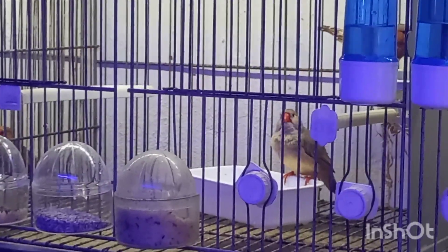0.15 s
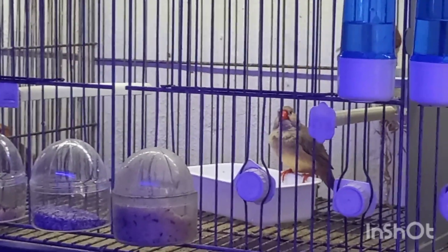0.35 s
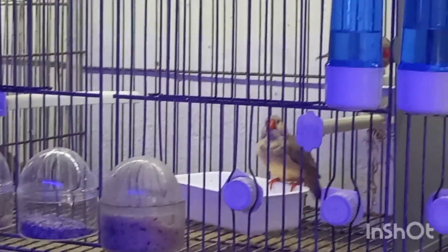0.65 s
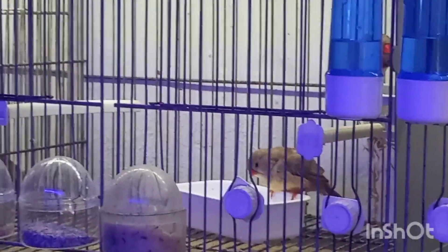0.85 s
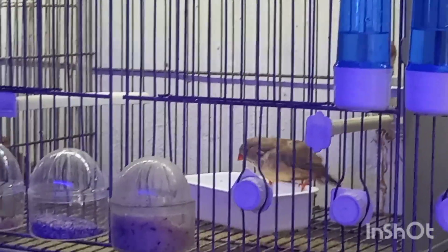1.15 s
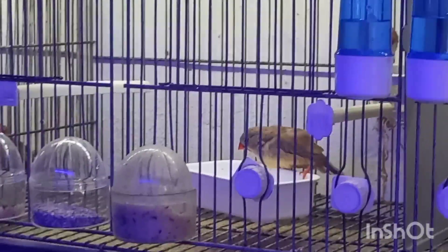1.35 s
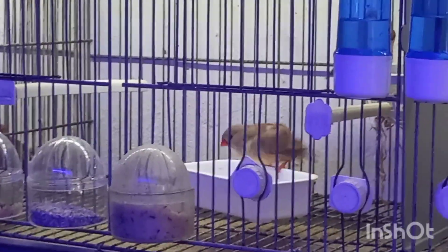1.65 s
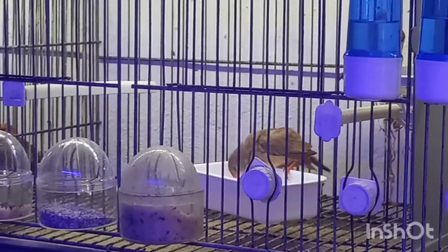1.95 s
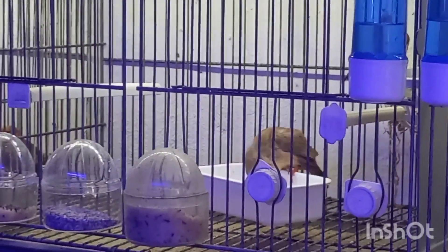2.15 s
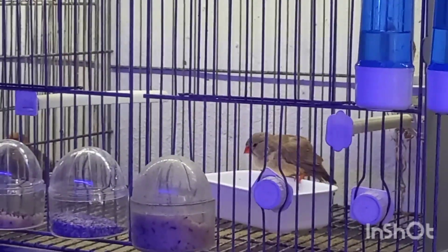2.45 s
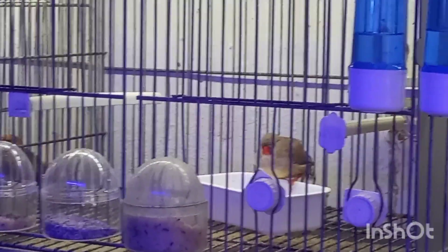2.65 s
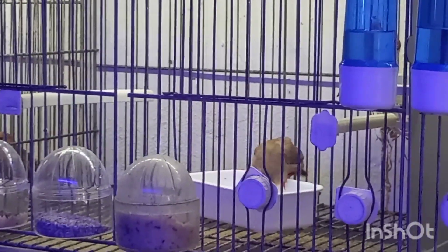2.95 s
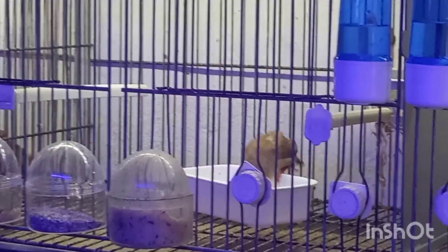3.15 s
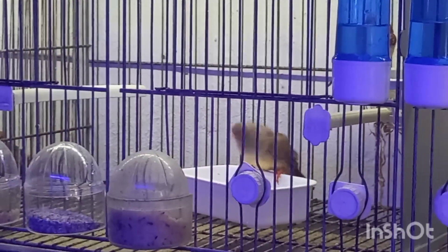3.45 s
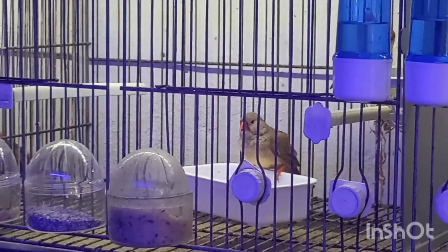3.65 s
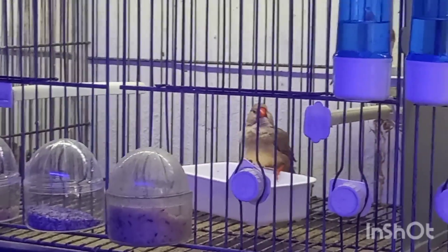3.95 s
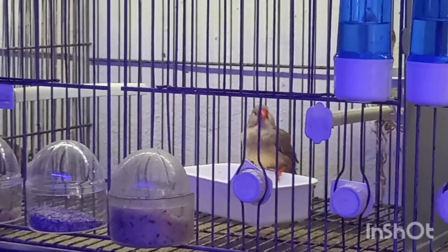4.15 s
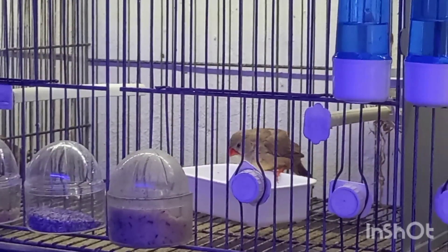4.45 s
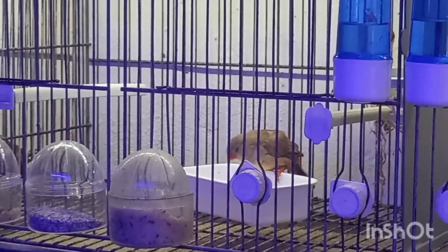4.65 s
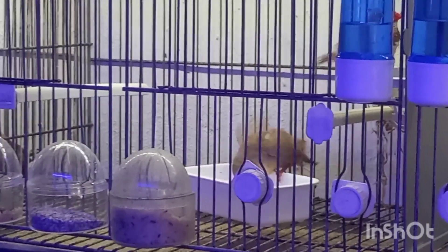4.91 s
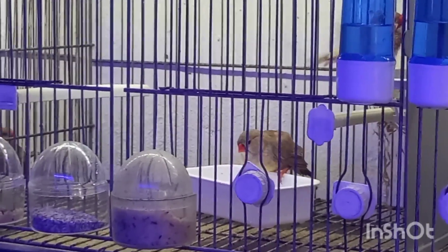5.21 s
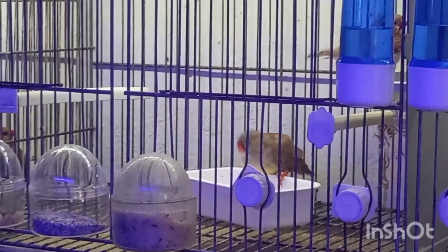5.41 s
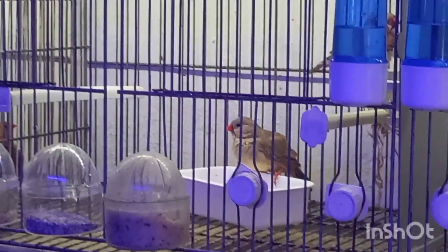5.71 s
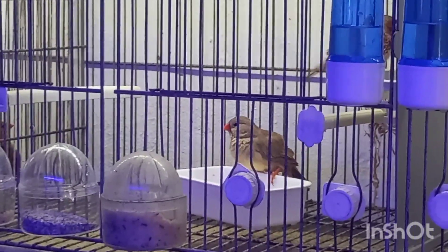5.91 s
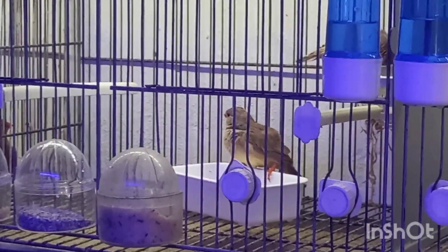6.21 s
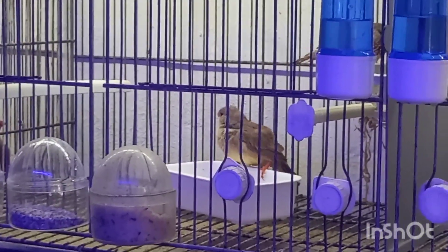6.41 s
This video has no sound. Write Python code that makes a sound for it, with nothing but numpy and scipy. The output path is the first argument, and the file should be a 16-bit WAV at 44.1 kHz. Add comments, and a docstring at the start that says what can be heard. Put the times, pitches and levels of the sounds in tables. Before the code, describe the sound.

A steady low electrical hum and soft rumble fill a small, hard-walled room throughout. Caged finches give a few soft, slightly hoarse notes in the first second. At about 1.2 seconds a quick raspy run-up leads into two louder nasal calls, between 1.6 and 2 seconds. A harsh falling chirp comes at 2.6 seconds, then a short note. A second raspy run-up starts at 3.4 seconds and opens into three evenly spaced nasal calls from 3.8 to 4.5 seconds. Sharp downward chirps follow at 4.6 and 5.2 seconds, with a barely audible thin whistle between them. From about 5 seconds, faint feather rustles and a few quiet notes continue until the end, near 6.6 seconds. The birds sound a little distant, with short reflections from the close walls.

```python
"""A small, hard-walled room with a steady mains hum, where zebra finches call in a wire cage.
Soft short notes and harsh falling chirps surround two song phrases, each a raspy run-up and then long
nasal calls: pulses and puffs of air from the syrinx, shaped by throat and beak. Feathers rustle now and
then, and a faint whistle passes late on. The birds arrive mostly by way of the walls.
A mild noise suppressor turns the hum down in the pauses."""
import sys
import numpy as np
from scipy import signal
from scipy.fft import rfft, irfft, next_fast_len
from scipy.io import wavfile
from scipy.ndimage import uniform_filter1d

SR = 44100
rng = np.random.default_rng(int(sys.argv[2]) if len(sys.argv) > 2 else 0)


def bounce(signal):
    """Save signal as a 16-bit WAV file at the path given by the first command-line argument."""
    frames = np.transpose(np.atleast_2d(signal))
    limited = np.clip(frames, -1, 1)
    pcm = np.round(limited * 32767).astype(np.int16)
    wavfile.write(sys.argv[1], SR, pcm)


N = 289734
BAND_LIMIT_HZ = 15800


def amp(db):
    """Decibels to linear gain."""
    return 10 ** (np.asarray(db) / 20)


def unit(x):
    """Scales to rms 1."""
    return x / np.sqrt(np.mean(x ** 2) + 1e-20)


def curve(points, hz):
    """Joins (freq_hz, value) points on a log-frequency axis."""
    freqs, values = np.transpose(points)
    return np.interp(np.log(hz + 1), np.log(freqs + 1), values)


def colour(x, gain_db):
    """Filters x by a function from Hz to dB."""
    size = next_fast_len(len(x) + 1024)
    return irfft(rfft(x, size) * amp(gain_db(np.fft.rfftfreq(size, 1 / SR))), size)[:len(x)]


def eq(x, points):
    """Filters x through (freq_hz, gain_db) points."""
    return colour(x, lambda f: curve(points, f))


def wander(size, rate_hz):
    """Smooth random drift below rate_hz, rms about 1."""
    noise = rng.standard_normal(size + SR // 4)
    return unit(colour(noise, lambda f: -10 * np.log10(1 + (f / rate_hz) ** 6)))[:size]


def fade(t, rise_s, fall_s):
    """Quarter-sine fade in and out."""
    fade_in = np.sin(np.pi / 2 * np.clip((t - t[0]) / rise_s, 0, 1))
    fade_out = np.sin(np.pi / 2 * np.clip((t[-1] - t) / fall_s, 0, 1))
    return fade_in * fade_out


def pan(sound, pan_db):
    """Stereo with the left side pan_db above the right."""
    return amp([[pan_db / 2], [-pan_db / 2]]) * sound


def place(mix, start_s, sound, pan_db):
    """Pans a sound and adds it to the mix at start_s."""
    part = mix[:, round(start_s * SR):][:, :len(sound)]
    part += pan(sound[:part.shape[1]], pan_db)


def noise_bed(spectrum, level_db):
    """Steady stereo noise, nearly centred in the bass and wide in the treble."""
    # likeness of left and right: freq_hz, coherence (0-1)
    likeness = [(25, 0.83), (70, 0.78), (150, 0.82), (300, 0.75), (600, 0.34), (1500, 0.21), (15000, .1)]
    left, independent = rng.standard_normal((2, N))
    coherence = curve(likeness, np.fft.rfftfreq(N, 1 / SR))
    right = irfft(coherence * rfft(left) + np.sqrt(1 - coherence ** 2) * rfft(independent), N)
    return amp(level_db) * np.array([unit(eq(side, spectrum)) for side in (left, right)])


def mains_hum(mains_hz=50, gain_db=1.5, waver=.25, waver_hz=4):
    """Low tones of a mains-driven machine, each wavering a little."""
    # hum tones: multiple of mains_hz, level_db (before gain_db)
    partials = [(1.522, -57.5), (2, -51.5), (3, -49.5), (4, -60), (5, -63.5), (6, -62.5), (7, -62)]
    t = np.arange(N) / SR
    hum = np.zeros(N)
    for multiple, level_db in partials:
        phase = 2 * np.pi * (multiple * mains_hz * t + rng.random())
        drift = 1 + waver * (wander(N, waver_hz) + 1j * wander(N, waver_hz))
        hum += amp(level_db + gain_db) * np.sqrt(2) * (drift * np.exp(1j * phase)).real
    return pan(hum, -.8)


def room_tone():
    """A low rumble under a faint hiss."""
    # spectra of the two beds: freq_hz, gain_db
    rumble_eq = [(20, -41), (35, -27.5), (50, -4.5), (78, -0.5), (105, -7.5), (125, -10.5), (160, -3),
                 (220, -8), (290, -5), (360, -14), (420, -17), (620, -31.5), (1000, -57)]
    hiss_eq = [(350, -23), (600, -14), (727, -3), (1010, 0), (1290, -11), (1540, -9.5), (1740, -11.5),
               (2110, -2.5), (2290, -9.5), (3650, -16.5), (4550, -28.5), (8420, -22), (9650, -64),
               (12000, -30.5), (15800, -35)]
    return noise_bed(rumble_eq, level_db=-49.5) + pan(noise_bed(hiss_eq, level_db=-73), -3.5)


def syrinx(hz, rough, jitter, jitter_hz=420):
    """The bird's voice source: slightly uneven pulses, with a puff of turbulent air in every cycle."""
    phase = 2 * np.pi * np.cumsum(hz * (1 + jitter * wander(len(hz), jitter_hz))) / SR
    pulses = sum(np.cos(k * phase) for k in range(1, int(BAND_LIMIT_HZ / hz.min()) + 2))
    puffs = (1 + np.cos(phase)) * rng.standard_normal(len(hz))
    return (1 - rough) * unit(pulses) + rough * unit(puffs)


def short_note(length_s, first_hz, last_hz, level_db, beak_hz, beak_db, treble_db, rough, arch_oct=0):
    """A glide through windpipe and beak: a resonance, a dip an octave up, a peak at three times it."""
    # the throat before the beak resonance: freq_hz, gain_db
    throat_eq = [(450, -13.5), (750, -1.5), (1050, 8.5), (1400, -4), (1900, 8), (3800, 0), (5200, -1),
                 (6500, -11), (8600, -8.5), (10500, -23.5), (13000, -30), (15300, -24)]
    t = np.arange(0, length_s, 1 / SR)
    arch = 2 ** (arch_oct * (np.sin(np.pi * t / length_s) - 2 / np.pi))
    source = syrinx(np.geomspace(first_hz, last_hz, len(t)) * arch, rough, jitter=.06 * rough)
    beak_width_oct = .47 + .9 * rough  # harsh notes spread wider

    def bell(f, multiple, width_oct):
        return np.exp(-(np.log2((f + 1) / (multiple * beak_hz)) / width_oct) ** 2)

    def tract_db(f):
        pipe_db = beak_db * bell(f, 1, beak_width_oct) - 7 * bell(f, 2, .25) + 5 * bell(f, 3, .12)
        shelf_db = curve([(5200, 0), (6400, treble_db)], f)
        return curve(throat_eq, f) + pipe_db + shelf_db

    envelope = fade(t, rise_s=min(.41 * length_s, .024), fall_s=.0017)
    return amp(level_db) * unit(colour(source, tract_db)) * envelope


def soft_calls(mix):
    """Low, slightly hoarse contact notes, each a glide with an arch laid over it."""
    # start_s, length_s, first_hz, last_hz, level_db, beak_hz, beak_db, treble_db, roughness (0-1)
    calls = [ (0.018, .047, 540.7, 437, -36, 3320, 18, 5, .2),
             (0.691, 0.042, 498, 423, -54, 2810, 12, 3.5, 0.17),
             (0.883, 0.051, 383, 426, -49.5, 2540, 23, 3.5, 0.22),
             (.982, 0.029, 453, 396, -50.5, 2320, 10.5, -3, 0.17),
             (2.885, .043, 629.4, 485.5, -40, 2650, 17, 3.5, 0.5),
             (3.124, 0.069, 647, 624, -58.5, 2530, 14, -27, 0.25),
             (3.762, 0.094, 485, 502.4, -42.5, 3260, 12, 3, 0.31),
             (4.745, .036, 455.5, 430, -45.5, 2170, 12.5, -1.5, 0.39),
             (5.701, .048, 586.5, 578.7, -47, 2340, 9, 8, 0.31),
             (6.032, 0.048, 473, 439.6, -54.5, 2420, 8, -2, 0.26),
             (6.282, 0.066, 482.4, 474.7, -49.5, 2660, 10, -4, 0.2),
             (6.55, 0.038, 563, 573, -55, 2270, 21, -4, 0.1)]
    for start_s, *shape in calls:
        place(mix, start_s, short_note(*shape, arch_oct=.064), pan_db=-5)


def rustles(mix, ticks_per_s=1500):
    """Feathers and feet on the wires: clumps of tiny ticks."""
    # movements: start_s, length_s, level_db, tilt_db_per_octave
    moves = [(0.234, 0.016, -67, 1.5), (4.876, 0.013, -63.5, 3), (4.918, 0.023, -62, 3),
             (4.954, 0.037, -72, 3), (5.058, 0.032, -67, 3), (5.295, 0.16, -59, 2),
             (5.501, 0.13, -67.5, -1.5), (5.708, 0.045, -55, 4), (6.164, 0.0068, -65, -6),
             (6.244, 0.14, -59, 0.5), (6.42, 0.042, -66.5, 2)]
    tick_eq = [(200, 6), (700, 6), (2500, -2), (5500, -11.5), (8500, -6.5), (12000, -14.5), (15000, -9.5)]
    for start_s, length_s, level_db, tilt_db in moves:
        t = np.arange(0, length_s, 1 / SR)
        ticks = rng.standard_normal(len(t)) * (rng.random(len(t)) < ticks_per_s / SR)
        ticks = colour(ticks, lambda f: curve(tick_eq, f) + tilt_db * np.log2(f + 1))
        envelope = fade(t, rise_s=length_s / 3, fall_s=length_s / 2)
        place(mix, start_s, amp(level_db) * unit(ticks) * envelope, pan_db=-5)


def run_ups(mix, soft_db=-47, loud_db=-37.5):
    """Raspy notes before the long calls: with more effort they fall further, open the beak and clear."""
    # run-up notes: start_s, length_s, pitch_hz, level_db
    notes = [ (1.182, 0.079, 1218, -46.5), (1.255, 0.035, 1115, -46), (1.34, 0.034, 1043, -44),
             (1.388, 0.03, 1059, -37.5), (1.436, 0.032, 1019, -46.5), (1.473, 0.028, 1067, -39),
             (3.407, 0.0513, 1185, -48.5), (3.473, .054, 1145, -44.5), (3.561, 0.0367, 1180, -42),
             (3.612, 0.024, 1052, -36), (3.645, 0.05, 1054, -45), (3.699, 0.028, 1069, -39)]
    # softest and loudest voicing: fall_octaves, beak_hz, beak_db, treble_db, roughness (0-1)
    voicings = [(0.102, 2270, 2.5, -0.5, 0.69), (.22, 3910, 9, 0, 0.48)]
    soft, loud = np.array(voicings)
    for start_s, length_s, hz, level_db in notes:
        effort = np.clip((level_db - soft_db) / (loud_db - soft_db), 0, 1)
        fall_oct, *timbre = soft + effort * (loud - soft)
        place(mix, start_s, short_note(length_s, hz, hz / 2 ** fall_oct, level_db, *timbre), pan_db=-1)


def nasal_voice(t, progress, hz):
    """A long call's upper voice: a clean harmonic stack through a wide-open beak, over a growing rasp."""
    # the open throat, and its turbulent air: freq_hz, gain_db
    throat_eq = [(600, -19.5), (970, -8), (1400, -34), (1950, -13), (2900, -11), (3900, 0), (4900, -15.5),
                 (5600, -23.5), (6800, -28), (8900, -22.5), (11000, -32), (13300, -39.5), (15300, -25.5)]
    rasp_eq = [(700, -16.5), (1700, -13), (2600, 0), (3700, 4.5), (4700, -4.5), (6200, -19.5), (9000, -21),
               (15000, -34)]
    stack = syrinx(hz, rough=.07, jitter=.004, jitter_hz=300)
    flutter_db = 2.2 * progress * wander(len(t), 110)  # the air stream flutters more and more
    stack = unit(eq(stack * amp(flutter_db), throat_eq))
    lows = eq(stack, [(2900, 0), (3400, -40)])
    beak_ring = eq(stack, [(3100, -40), (3400, 0), (4300, 0), (4600, -40)])
    stack += lows * (amp(-18 * np.exp(-t / .016)) - 1)  # low partials swell in after the beak speaks
    stack += beak_ring * (amp(-3 * progress ** 2) - 1)  # the ringing fourth partial weakens late
    rasp = unit(eq(syrinx(hz, rough=1, jitter=0), rasp_eq))
    return stack + rasp * amp(-15 + 6 * progress)


def long_call(length_s, held_hz, level_db, treble_db, second_hz, join_share, second_db):
    """A nasal voice scoops up, holds and sags at the end; partway, a lower, harsher one joins it."""
    # the throat as the second voice passes it: freq_hz, gain_db
    second_eq = [(650, -48), (1170, -7), (1700, -12.5), (2350, 2.5), (3500, 0), (4400, -10), (6000, -27.5),
                 (8900, -16), (12500, -26), (15200, -11.5)]
    scoop_oct, creep_oct_per_s, sag_oct, waver_oct = .09, .15, .045, .006
    scoop_s, sag_s, swell_s = .016, .022, .035
    t = np.arange(0, length_s, 1 / SR)
    progress = t / length_s
    sag = np.exp((t - length_s) / sag_s)
    bend_oct = creep_oct_per_s * (t - length_s / 2) - scoop_oct * np.exp(-t / scoop_s) - sag_oct * sag
    first = nasal_voice(t, progress, held_hz * 2 ** (bend_oct + waver_oct * wander(len(t), 35)))
    second = unit(eq(syrinx(np.full(len(t), second_hz), rough=.25, jitter=.02), second_eq))
    blend = amp(second_db) * np.clip((t - join_share * length_s) / swell_s + .5, 0, 1)
    voice = (first + blend * second) / np.sqrt(1 + blend ** 2)
    # harder pressure snaps the syrinx shut faster and lifts the treble
    treble = eq(voice, [(4800, -40), (5800, 0)])
    voice += treble * (amp(treble_db - 4 + 8 * progress) - 1)
    return voice * amp(level_db - 1.5 * sag) * fade(t, rise_s=.007, fall_s=.015)


def song_calls():
    """The long calls of both phrases; the walls favour one side for each partial."""
    # start_s, length_s, pitch_hz, level_db, treble_db, second_voice_hz,
    # join_share (0-1 of the call), second_voice_db (against the first), pan_db
    calls = [ (1.594, 0.2, 982.7, -29.5, -3, 502, 0.54, -6.5, -1.5),
             (1.861, 0.18, 967.6, -30, -3, 587.5, 0.67, -4, -2.5),
             (3.822, .18, 1012, -30.5, -1.5, 598, 0.8, -6.5, 0),
             (4.077, .18, 986, -30, -3.5, 586, 0.66, -3.5, -2),
             (4.342, .19, 972.4, -31, -3.5, 579.5, 0.64, -1.5, -1)]
    # the walls' stereo lean: freq_hz, pan_db
    lean = [(970, 4), (1950, -4), (2900, -.5), (3900, -1), (4900, 1), (9000, 1), (15000, -4)]
    song = np.zeros((2, N))
    for start_s, *shape, pan_db in calls:
        place(song, start_s, long_call(*shape), pan_db)
    left = colour(song[0], lambda f: curve(lean, f) / 2)
    right = colour(song[1], lambda f: -curve(lean, f) / 2)
    return np.array([left, right])


def chirps(mix, beak_db=14, rough=.18):
    """Quick strings of harsh, steep downward sweeps with the beak wide open."""
    # sweeps: start_s, length_s, pitch_hz, fall_octaves_per_s, level_db, beak_hz, treble_db
    sweeps = [ (2.581, 0.083, 1129, 4, -41, 3160, 5.5), (2.61, 0.037, 1293, 6.8, -35.5, 4600, -1.5),
              (2.632, 0.057, 1122, 7.9, -38.5, 4830, -29), (2.67, 0.043, 829, 4, -35, 3860, 3.5),
              (4.542, 0.038, 1017, 10.6, -31.5, 3500, 1), (4.576, 0.043, 893, 16.7, -32, 3420, 2.5),
              (5.161, 0.057, 1172, 4.8, -40, 3500, 11), (5.183, 0.039, 1373, 7.8, -31, 4830, -3),
              (5.226, 0.045, 1087, 12.5, -34, 4300, -1), (5.257, 0.032, 846, 12.6, -30.5, 3800, 4.5)]
    for start_s, length_s, hz, fall_rate, level_db, beak_hz, treble_db in sweeps:
        last_hz = hz / 2 ** (fall_rate * length_s)
        chirp = short_note(length_s, hz, last_hz, level_db, beak_hz, beak_db, treble_db, rough)
        place(mix, start_s, chirp, pan_db=-3.2)


def whistle(mix, slip_share=.48, slip_s=.055, sink_hz_per_s=600):
    """One thin, nearly pure tone that sinks steadily, slips down a step midway and fades."""
    # the tone and its step: start_s, length_s, upper_hz, lower_hz, level_db
    gesture = (4.76, .32, 5120, 4820, -75.5)
    start_s, length_s, upper_hz, lower_hz, level_db = gesture
    t = np.arange(0, length_s, 1 / SR)
    slip = (1 - np.tanh((t - slip_share * length_s) / slip_s)) / 2
    hz = lower_hz + (upper_hz - lower_hz) * slip - sink_hz_per_s * (t - length_s / 2)
    hz *= 1 + .005 * wander(len(t), 150)
    tone = np.sin(2 * np.pi * np.cumsum(hz) / SR)
    place(mix, start_s, amp(level_db) * tone * fade(t, rise_s=.1, fall_s=.17), pan_db=-3)


def room(x, direct_db=-6.5, walls_db=-2, build_up_s=.0016, left_lag_s=.00024):
    """Weak direct sound, reaching the right side first, and dense reflections from close walls."""
    # reverb time: freq_hz, t60_s
    decay = [(300, 0.17), (1000, 0.34), (2300, 0.37), (4000, 0.3), (8000, 0.27), (15000, 0.12)]
    step = SR // 4000  # one reflection falls at random in each step
    slots = np.arange(0, SR * 3 // 4, step)
    arrivals = slots + rng.integers(0, step, (2, len(slots)))
    taps = np.zeros((2, SR))
    np.put_along_axis(taps, arrivals, rng.choice([-1., 1.], arrivals.shape), 1)
    hz, t, bands = signal.stft(taps, SR, nperseg=256)
    bands *= amp(-60 * t / curve(decay, hz)[:, None])
    tail = signal.istft(bands * (1 - np.exp(-t / build_up_s)), SR)[1]
    response = amp(walls_db) * tail / np.linalg.norm(tail, axis=1, keepdims=True)
    response[0, round(left_lag_s * SR)] += amp(direct_db)
    response[1, 0] += amp(direct_db)
    return signal.fftconvolve(x, response, axes=1)[:, :N]


def noise_suppressor(x, depth_db=-3, shut_db=-62, open_db=-35, smooth_s=.04):
    """Turns the bass down a little while the range above it is quiet."""
    bass = np.array([eq(side, [(450, 0), (700, -60)]) for side in x])
    upper_power = uniform_filter1d(((x - bass) ** 2).mean(0), round(smooth_s * SR))
    upper_db = 10 * np.log10(abs(upper_power) + 1e-12)
    quiet = np.clip((open_db - upper_db) / (open_db - shut_db), 0, 1)
    return x + bass * (amp(depth_db * quiet) - 1)


def scene():
    """The birds in their room and one dry whistle, over hum, rumble and hiss."""
    birds = song_calls()
    soft_calls(birds)
    run_ups(birds)
    chirps(birds)
    rustles(birds)
    mix = room(birds)
    whistle(mix)
    return mix + mains_hum() + room_tone()


def record(dry, port_db=4, port_hz=15200, port_width_hz=900):
    """The microphone port rings at the very top; a noise suppressor and a band limit follow."""
    def ring_db(f):
        return port_db * np.exp(-((f - port_hz) / port_width_hz) ** 2)

    heard = np.array([colour(side, ring_db) for side in dry])
    lowpass = signal.firwin(1023, BAND_LIMIT_HZ, window=("kaiser", 9), fs=SR)
    return signal.oaconvolve(noise_suppressor(heard), lowpass[None], "same")


dry = scene()
out = record(dry)
bounce(out)
```